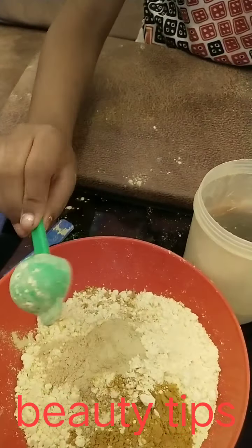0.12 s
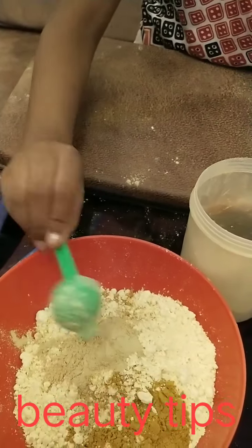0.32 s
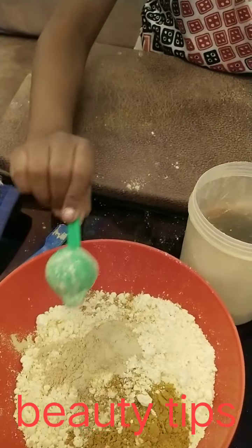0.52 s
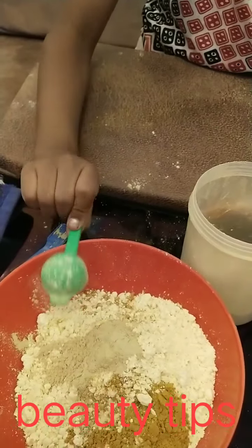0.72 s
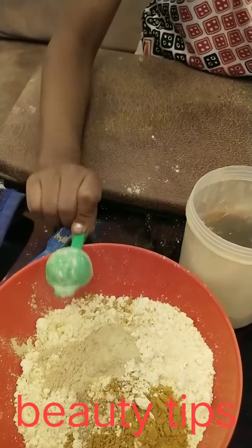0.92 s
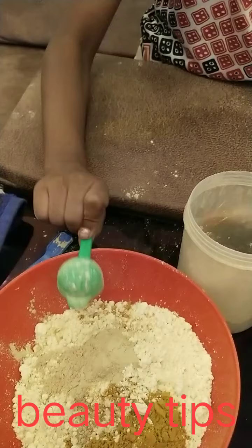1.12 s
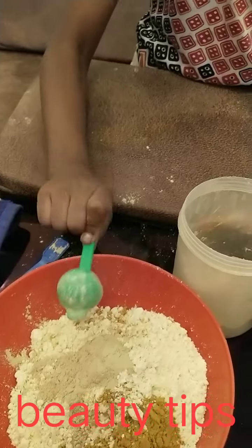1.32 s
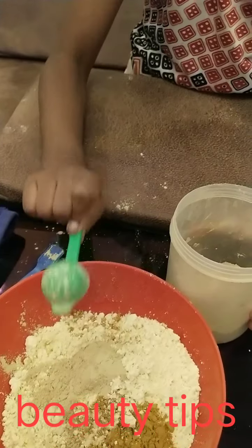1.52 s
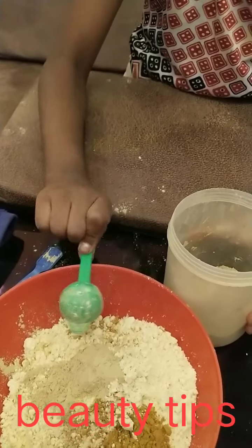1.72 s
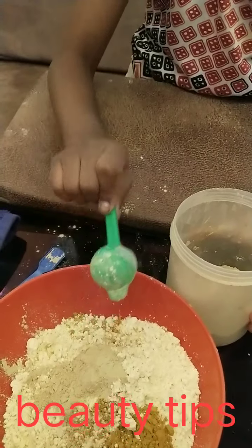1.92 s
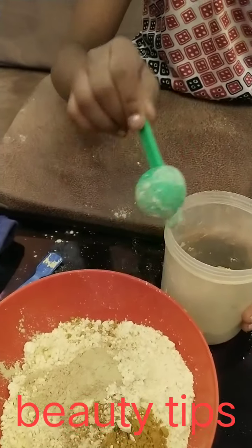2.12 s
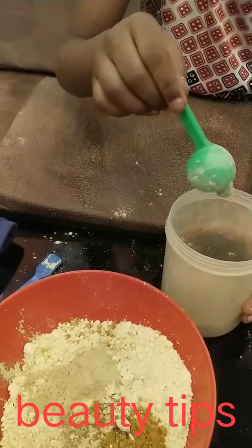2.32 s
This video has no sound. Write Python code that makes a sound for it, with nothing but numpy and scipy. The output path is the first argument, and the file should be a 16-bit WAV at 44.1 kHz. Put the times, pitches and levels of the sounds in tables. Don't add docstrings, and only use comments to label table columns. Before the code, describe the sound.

Hollow plastic taps of a scoop against a bowl edge, about four a second, in a humming room

```python
import sys
import numpy as np
from scipy import signal
from scipy.io import wavfile

SR = 44100
rng = np.random.default_rng(int(sys.argv[2]) if len(sys.argv) > 2 else 0)


def dump(signal):
    limited = np.clip(np.atleast_2d(signal).T, -1, 1)
    pcm = np.round(limited * 32767).astype(np.int16)
    wavfile.write(sys.argv[1], SR, pcm)


def ratio_of_db(decibels):
    return 10 ** (np.asarray(decibels, float) / 20)


N = 105840


def rms_one(x):
    return x / np.sqrt(np.mean(x ** 2) + 1e-20)


def at_hz(points, hz):
    table_hz, value = np.array(points).T
    return np.interp(np.log(hz), np.log(table_hz), value)


def pan(left_minus_right_db):
    return ratio_of_db([[left_minus_right_db / 2], [-left_minus_right_db / 2]])


def bandpass(x, order, low_hz, high_hz):
    return signal.sosfilt(signal.butter(order, [low_hz, high_hz], "band", fs=SR, output="sos"), x)


def drift(rate_hz):
    r = np.exp(-80 * np.pi * rate_hz / SR)
    white = rng.standard_normal(N // 40 + 2002)
    slow = signal.lfilter([1], [1, -2 * r, r * r], white)[2000:]
    return np.interp(np.arange(N) / 40, np.arange(len(slow)), rms_one(slow))


def clicks(start_s, gains):
    out, at = np.zeros(N), np.asarray(start_s) * SR
    np.add.at(out, at.astype(int), gains * (1 - at % 1))
    np.add.at(out, at.astype(int) + 1, gains * (at % 1))
    return out + 1e-18


def ring(x, hz, t60_s):
    r, w = ratio_of_db(-60 / (t60_s * SR)), 2 * np.pi * hz / SR
    return signal.lfilter([0, np.sin(w)], [1, -2 * r * np.cos(w), r * r], x)


def bands(size, alike, gain):
    out, edges_hz = 0, 22 * 2 ** np.arange(0, 9.6, .5)
    white = rng.standard_normal((2, 2, size))
    for k, (low_hz, high_hz) in enumerate(zip(edges_hz, edges_hz[1:])):
        mid, side = bandpass(white[k % 2], 2, low_hz, high_hz)
        hz = np.sqrt(low_hz * high_hz)
        likeness = np.clip(at_hz(alike, hz), -1, 1)
        stereo = np.sqrt(1 + likeness) * mid + np.sqrt(1 - likeness) * side * [[1], [-1]]
        out = out + gain(hz) * stereo
    return out


# freq_hz, level_db_per_hz
AIR_SPECTRUM = [(15, -48), (25, -31), (195, 10), (317, -14), (384, -2), (416, -20.5), (503, -5), (754, -6),
                (16000, -33)]
# freq_hz, likeness
AIR_LIKENESS = [(60, 0.99), (240, 0.92), (950, -0.34), (3770, 0.12), (15000, -0.35)]
# freq_hz, left_minus_right_db
AIR_BALANCE = [(60, 4), (380, -4.5), (2380, 4.5), (15000, 1)]
# freq_hz, width_hz, level_db
DUCT_MODES = [(137.3, 11, -66), (219, 17, -61.5), (305.3, 10, -64.5), (416, 90, -72.5), (501, 81, -69),
              (1094, 49, -76.5), (1640, 240, -78)]
# harmonic, level_db
MOTOR_HUM = [(1, -73), (2, -72), (4, -72), (6, -78), (7, -73), (8, -71), (32, -87.5), (33, -80.5),
             (34, -84.5), (36, -107), (38, -83.5), (40, -90.5), (43, -88)]
AIR_DB, HISS_DB, MOTOR_HZ = -59.5, -83.5, 48.78


def fan():
    together = drift(4.5)

    def air_gain(hz):
        level_db = at_hz(AIR_SPECTRUM, hz) + 0.13 * together + 1.2 * drift(3.5)
        return pan(at_hz(AIR_BALANCE, hz)) * ratio_of_db(level_db)

    air = bands(N, AIR_LIKENESS, air_gain)
    out = ratio_of_db(AIR_DB + 0.5) * rms_one(air) + ratio_of_db(HISS_DB) * rng.standard_normal((2, N))
    for hz, width_hz, level_db in DUCT_MODES:
        noise = rng.standard_normal(N) + 0.23 * rng.standard_normal((2, N))
        out += pan(2.8) * ratio_of_db(level_db) * rms_one(ring(noise, hz, 2.45 / width_hz))
    turn_rad = 2 * np.pi * MOTOR_HZ * np.cumsum(1 + 0.0003 * drift(1)) / SR
    for harmonic, level_db in MOTOR_HUM:
        tone = np.sin(round(harmonic) * turn_rad + rng.uniform(0, 2 * np.pi))
        out += pan(2.2) * np.sqrt(2) * ratio_of_db(level_db + 3.2 * drift(11.2)) * tone
    return out


# start_s, level_db, hardness_db, place_along_handle (0-1)
STRIKES = [(.2331, -7, 5.5, 0.46), (0.2414, -20, 8, 0.82), (0.2455, -22.5, -14.5, 0),
           (0.4528, -13, -1, 0.86), (0.4567, -17.5, 8, 0), (0.6945, -10, 1.5, 0.08),
           (0.9031, -10.5, 1, 0.18), (1.1448, -12, 2.5, 0.47), (1.158, -30, -3, 0.2), (1.272, -18, -2.5, 1),
           (1.2905, -41, 11, 0.96)]
ECHO_DB = [-12, -1.5]
CRACK_HZ, CRACK_T60_S, CRACK_DB, CRACK_PAN_DB = 2200, 0.0013, -8, 7
RIGHT_LEAD_S, TABLE_ECHO_S = .0001, .0007


def crack():
    start_s, db, hard_db, _ = np.transpose(STRIKES)
    gains = ratio_of_db(db + CRACK_DB + 0.13 * hard_db)
    ports = []
    for lead_s, echo_db in zip([0, RIGHT_LEAD_S], ECHO_DB):
        direct = clicks(start_s - lead_s, gains)
        echo = clicks(start_s - lead_s + TABLE_ECHO_S, gains * ratio_of_db(echo_db))
        ports.append(direct + echo)
    swell = ring(np.array(ports), CRACK_HZ, CRACK_T60_S)
    swell = ring(swell, CRACK_HZ, CRACK_T60_S)
    return pan(CRACK_PAN_DB) * np.diff(swell, prepend=0)


SPREAD_DB, LONGEST_CYCLES = .6, 70
CONTACT_HZ = 3780


def body(pitches_hz, senses, modes, hardness_per_octave, right_lag_s):
    start_s, db, hard_db, place = np.transpose(STRIKES)
    chance, out = rng.standard_normal((len(start_s), len(modes))), np.zeros((2, N))
    for k, (hz, sense, mode) in enumerate(zip(pitches_hz, senses, modes)):
        level_db, t60_s, pan_db, slope_db = mode
        tilt_db = hardness_per_octave * hard_db * np.log2(hz / 1500)
        strike_db = db + tilt_db + level_db + slope_db * place + SPREAD_DB * chance[:, k]
        gains = sense * ratio_of_db(strike_db)
        decay_s = min(t60_s, LONGEST_CYCLES / hz)
        rings = [ring(clicks(start_s + lag_s, gains), hz, decay_s) for lag_s in (0, right_lag_s)]
        wall_speed = np.diff(rings, prepend=0) / (2 * np.sin(np.pi * hz / SR))
        out += pan(pan_db) * wall_speed
    return signal.lfilter(*signal.butter(2, CONTACT_HZ, fs=SR), out)


# level_db, t60_s, left_minus_right_db, gain_along_handle_db
BOWL_MODES = [(-18.5, 0.047, -3, -4.5), (-26, 0.092, 7.5, 6), (-23, 0.046, -8, 5), (-6, 0.02, 4.5, -4),
              (-25, 0.068, 4.5, 14.5), (-7, 0.013, 3, -1.5), (-6.5, 0.033, 1.5, -5.5), (-23, 0.099, 24, -2),
              (-15.5, 0.14, -7, 6.5), (-3.5, 0.011, 2, 2.5), (-21, 0.084, -20.5, 1), (-10, 0.0049, 9, 6),
              (-56, 0.0092, -4, -22)]
BOWL_PITCHES = [195, 270, 390, 668, 722, 816, 973, 1072, 1148, 1240, 1405, 1530, 1830]
BOWL_SENSES = [-1, -1, 1, 1, 1, -1, 1, -1, 1, -1, -1, 1, 1]
RIGHT_LAG_S = .00013


def bowl_ring():
    return body(BOWL_PITCHES, BOWL_SENSES, BOWL_MODES, 0.14, RIGHT_LAG_S)


# level_db, t60_s, left_minus_right_db, gain_along_handle_db
SPOON_MODES = [(-10.5, 0.0047, 14, 0.5), (-22.5, 0.015, -10, 0), (-15, 0.002, 10, -18),
               (-13, 0.0021, -2, -23), (-7, 0.0027, -8, 2), (-16, 0.033, 16, -19), (-13, 0.0041, 22.5, 9.5),
               (-40, 0.0041, 4, -5), (-21.5, 0.0025, 38.5, 11.5), (-9, 0.0076, 19, 2), (-24, .004, 20, -12)]
SPOON_PITCHES = [2050, 2400, 2820, 3350, 3830, 4930, 5770, 6900, 8400, 9560, 13000]
SPOON_SENSES = [1, -1, -1, 1, -1, 1, -1, 1, -1, 1, -1]


def spoon_ring():
    return body(SPOON_PITCHES, SPOON_SENSES, SPOON_MODES, 0.31, -RIGHT_LEAD_S)


CLATTER_DB, CLATTER_T60_S, CLATTER_HZ = -25, 0.06, 4630


def clatter():
    start_s, db, hard_db, _ = np.transpose(STRIKES)
    hits = clicks(start_s, ratio_of_db(db + 0.5 * hard_db + CLATTER_DB))
    level = signal.lfilter([1], [1, -ratio_of_db(-60 / (CLATTER_T60_S * SR))], hits)
    grains = rng.standard_normal((2, N)) * ratio_of_db(1.5 * drift(150))
    band = bandpass(grains, 2, CLATTER_HZ * 0.72, CLATTER_HZ * 1.49)
    return pan(CRACK_PAN_DB) * level * rms_one(band)


THUMP_HZ, THUMP_DB, THUMP_T60_S = 140.4, -25, 0.027


def thump():
    start_s, db, *_ = np.transpose(STRIKES)
    return pan(7.4) * ring(clicks(start_s + 0.0019, ratio_of_db(db + THUMP_DB)), THUMP_HZ, THUMP_T60_S)


SPRAY_DB, SPRAY_HZ = 0, 2930


def spray():
    start_s, db, hard_db, _ = np.transpose(STRIKES)
    dull_hits = clicks(start_s, ratio_of_db(db + SPRAY_DB))
    bright_hits = clicks(start_s, ratio_of_db(db + 2.34 * hard_db + SPRAY_DB - 17.5))
    dull = signal.lfilter(*signal.butter(1, [500, SPRAY_HZ], "band", fs=SR), dull_hits)
    bright = signal.lfilter(*signal.butter(2, [4500, 11500], "band", fs=SR), bright_hits)
    return dull + bright


# freq_hz, t60_s
ROOM_DECAY = [(100, 0.56), (260, 0.59), (700, 0.59), (1840, 0.37), (4850, 0.7), (12800, 0.16)]
# freq_hz, level_db
ROOM_TINT = [(40, -7.5), (150, 16), (300, 2), (450, 2.5), (800, 1), (3000, 1.5), (7000, 3), (14000, 4.5)]
# freq_hz, likeness
ROOM_LIKENESS = [(60, 0.97), (240, 0.95), (950, 0.067), (3770, 0.04), (15000, -0.26)]
ROOM_DB, ROOM_RISE_S, ROOM_PAN_DB = -7, 0.013, 1.5
EARLY_DB, EARLY_T60_S = -2.5, 0.24


def room(sent):
    t = np.arange(SR // 2) / SR

    def tail_gain(hz):
        return ratio_of_db(at_hz(ROOM_TINT, hz) - 60 * t / at_hz(ROOM_DECAY, hz))

    tail = bands(len(t), ROOM_LIKENESS, tail_gain)
    rise = 1 - np.exp(-(t / ROOM_RISE_S) ** 2)
    early = 1 + ratio_of_db(EARLY_DB - 60 * t / EARLY_T60_S)
    tail = tail * rise * early * ratio_of_db(ROOM_DB - 33.5) * pan(ROOM_PAN_DB)
    return signal.fftconvolve(tail, sent[None], axes=1)[:, :N]


# start_s, length_s, level_db, centre_hz
SLEEVE_RUSTLES = [
    (1.496, 0.096, -63.5, 2150),
    (1.506, 0.11, -73.5, 6200),
    (2.057, .008, -73, 10500),
    (2.06, 0.15, -70.5, 2200),
    (2.345, 0.057, -68.5, 2320),
]


def sleeve():
    out, t = np.zeros((2, N)), np.arange(N) / SR
    for start_s, length_s, level_db, hz in SLEEVE_RUSTLES:
        grains = rng.standard_normal((2, N)) * ratio_of_db(1.8 * drift(45))
        band = bandpass(grains, 1, hz * 0.9, hz * 1.14)
        swell = np.sin(np.pi * np.clip((t - start_s) / length_s, 0, 1))
        out += ratio_of_db(level_db) * rms_one(band) * swell
    return out


SPOON_ROOM_DB, BOWL_ROOM_DB = -10, -4


def scene():
    bowl = bowl_ring() + thump()
    spoon = spoon_ring() + crack() + clatter()
    sent = np.mean(ratio_of_db(BOWL_ROOM_DB) * bowl + ratio_of_db(SPOON_ROOM_DB) * spoon, axis=0) + spray()
    return fan() + bowl + spoon + room(sent) + sleeve()


def band_limit(x):
    return signal.sosfilt(signal.butter(12, 16400, fs=SR, output="sos"), x)


def record(dry):
    cut = signal.sosfilt(signal.butter(3, 55, "high", fs=SR, output="sos"), dry)
    cut = signal.sosfilt(signal.cheby2(5, 25, 16800, fs=SR, output="sos"), cut)
    return band_limit(cut)


dry = scene()
out = record(dry)
dump(out)
```